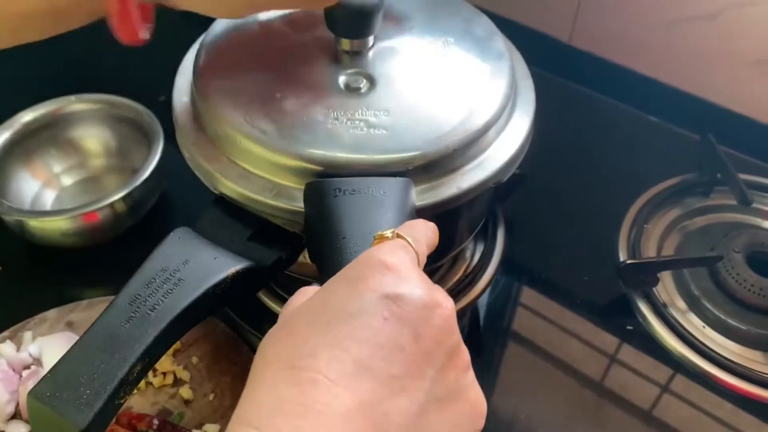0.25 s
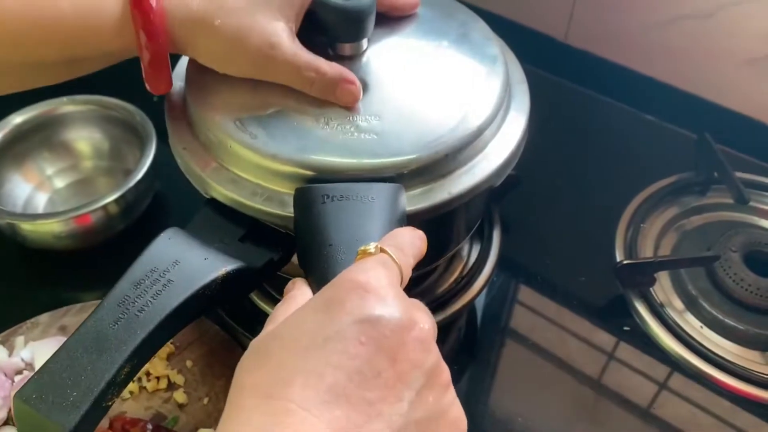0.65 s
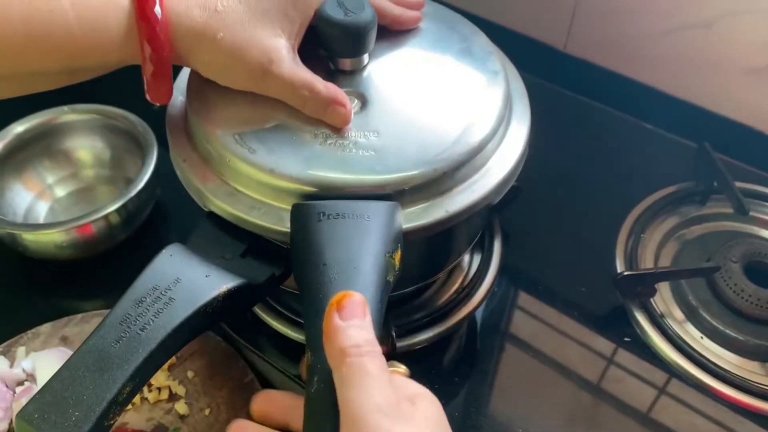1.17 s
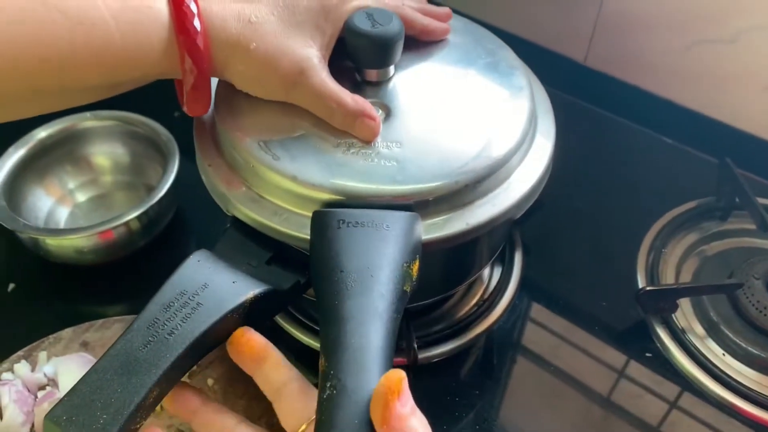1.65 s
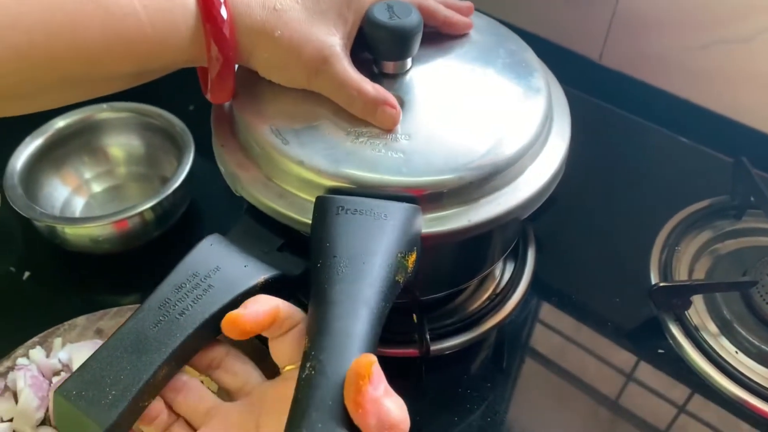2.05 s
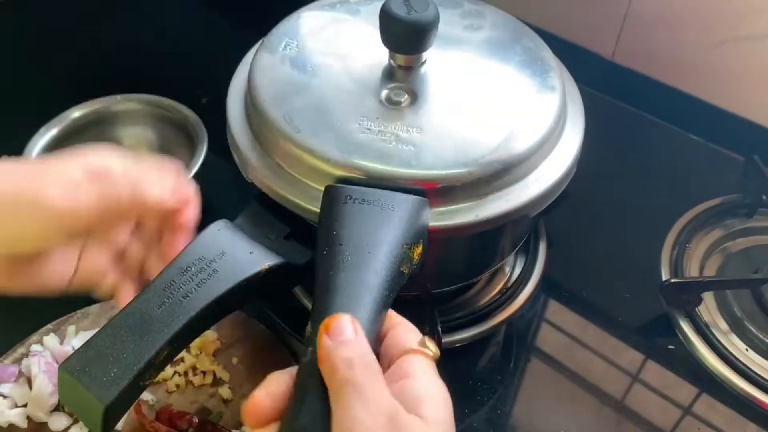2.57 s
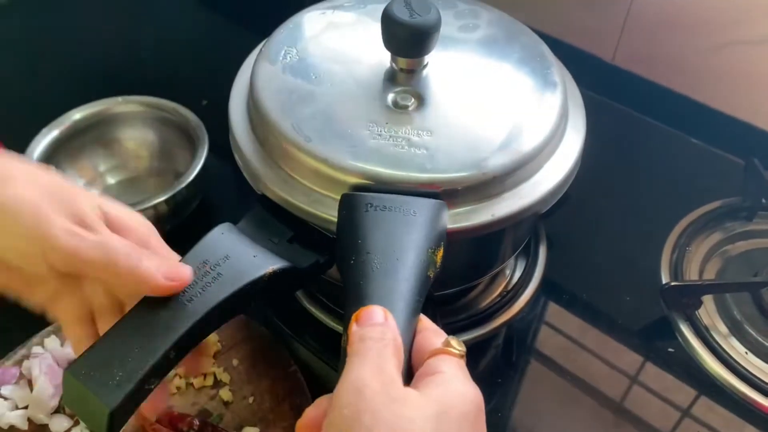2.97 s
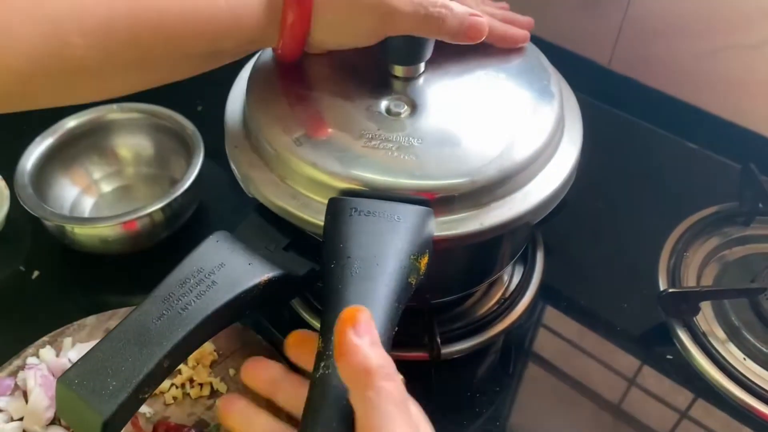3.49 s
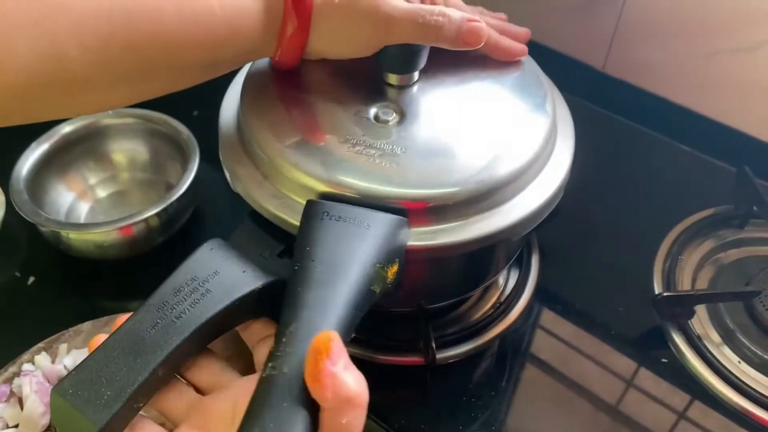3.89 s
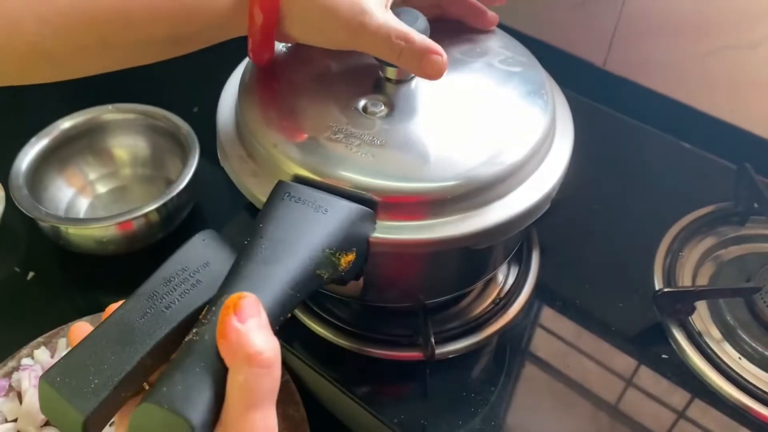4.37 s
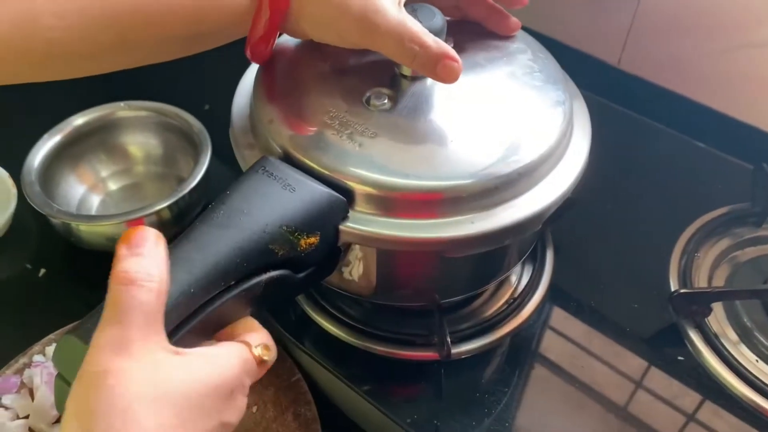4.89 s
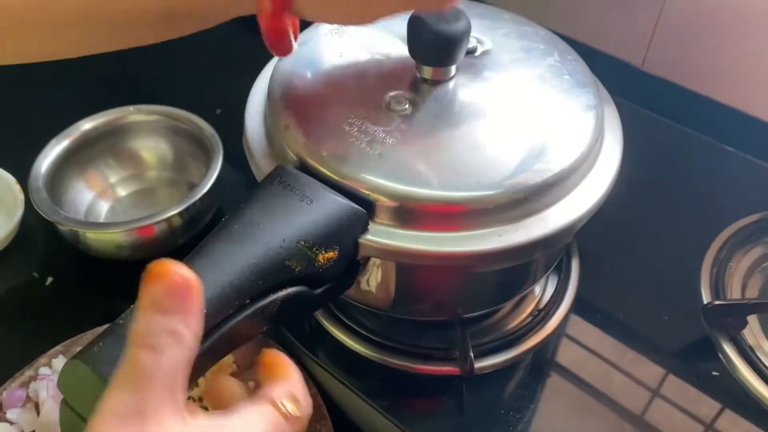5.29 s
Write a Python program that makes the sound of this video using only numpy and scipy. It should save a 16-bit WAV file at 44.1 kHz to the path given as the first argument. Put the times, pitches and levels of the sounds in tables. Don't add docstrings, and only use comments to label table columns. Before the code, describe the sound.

Close kitchen handling of a metal cooker: soft hollow thumps, small ticks, rubber drags and two ringing clacks over faint steady hiss.

```python
import sys
import numpy as np
from scipy import signal
from scipy.fft import rfft, irfft
from scipy.io import wavfile
from scipy.ndimage import uniform_filter1d

SR = 44100
rng = np.random.default_rng(int(sys.argv[2]) if len(sys.argv) > 2 else 0)


def materialize(psi):
    bounded = np.clip(np.atleast_2d(psi).T, -1, 1)
    quanta = np.round(bounded * 32767).astype(np.int16)
    wavfile.write(sys.argv[1], SR, quanta)


def voltage_ratio(decibels):
    exponent = np.asarray(decibels, float) / 20
    return 10 ** exponent


N = 244710
RING = np.arange(16384) / SR


def evened(x):
    return x / np.sqrt(np.mean(x ** 2) + 1e-20)


def read(points, hz):
    table_hz, value = np.transpose(points)
    return np.interp(np.log(hz + 1), np.log(table_hz + 1), value)


def add(mix, start_s, sound):
    part = mix[max(round(start_s * SR), 0):][:len(sound)]
    part += sound[:len(part)]


def coloured(noise, points):
    hz = np.fft.rfftfreq(len(noise), 1 / SR)
    return evened(irfft(rfft(noise) * voltage_ratio(read(points, hz)), len(noise)))


def smoothed(noise, span):
    return evened(uniform_filter1d(uniform_filter1d(noise, span), span))


def wobble(noise, span_s):
    return smoothed(noise, max(round(span_s * SR), 1))


def ringing(hz, t60):
    return voltage_ratio(-60 * RING / np.abs(t60)[:, None]) * np.sin(2 * np.pi * hz[:, None] * RING)


def burst(rise_s, fall_s):
    return (1 - np.exp(-RING / rise_s)) * np.exp(-RING / fall_s)


# freq_hz, likeness_0_to_1, hiss_left_lead_rad, pot_left_lead_rad
PORT_LIKENESS = [(0, .98, 0, 0), (120, .99, 0, 0), (280, .88, 0, -.1), (600, .35, -.3, -.3),
                 (1100, .25, -2.4, 1.6), (1800, .4, -3.1, .9), (2800, .25, -4.7, 1.4), (3700, .4, -6.3, 1),
                 (4600, .3, -6.3, .5), (5600, .25, -8.9, 0), (6200, .55, -12.5, -.1),
                 (6600, .75, -12.6, -.2), (7200, .5, -13.8, -1.2), (7750, .8, -15.4, -2.4),
                 (9100, .72, -16, -2.8), (9750, .75, -17.2, -4.6), (10500, .82, -18.7, -6.2),
                 (13000, .99, -18.85, -9.9)]


def pair(first, second, column):
    hz = np.fft.rfftfreq(N, 1 / SR)
    ports = np.transpose(PORT_LIKENESS)
    same = np.clip(np.interp(hz, ports[0], ports[1]), 0, 1)
    lead_rad = np.interp(hz, ports[0], ports[column])
    blend = same * rfft(first) + np.sqrt(1 - same ** 2) * rfft(second)
    return np.array([first, irfft(blend * np.exp(-1j * lead_rad), N)])


# freq_hz, level_db_per_hz
HISS_COLOUR = [(25, -7), (60, -3), (150, 5.5), (300, -1.5), (600, -6.5), (1200, -2.5), (2500, -4.5),
               (3000, -4.5), (4000, -6), (5800, -4.5), (7500, -3.5), (8400, -1), (10500, -1.5), (11600, -6)]
# freq_hz, left_minus_right_db
HISS_LEAN = [
    (3000, 0),
    (4400, -2.5),
    (5300, -6.5),
    (5900, -6.5),
    (6300, -0.5),
    (7600, -2),
    (8200, 0.5),
]
HISS_DB = -41.5


def hiss():
    lean_db = read(HISS_LEAN, np.fft.rfftfreq(N, 1 / SR))
    lean = voltage_ratio(np.array([[.5], [-.5]]) * lean_db)
    first, second, slow = rng.standard_normal((3, N))
    swell = voltage_ratio(0.7 * smoothed(slow, 9000))
    stereo = pair(coloured(first, HISS_COLOUR), coloured(second, HISS_COLOUR), column=2)
    return voltage_ratio(HISS_DB) * swell * irfft(rfft(stereo) * lean, N)


# start_s, grip_effort_db
GRIP = [(0.0, 10), (0.15, -7.5), (0.26, 6.5), (0.66, -0.5), (1.05, -7), (1.28, -23), (1.5, 1.5), (1.84, -6),
        (2.1, 1.5), (2.35, -4), (2.62, 2), (2.89, -9.5), (3.34, 4.5), (3.55, -10), (3.95, 9), (4.27, -21),
        (4.5, -3.5), (4.98, -26)]
# start_s, length_s, level_db
GASKET_SLIDES = [(0.04, 0.061, -57), (0.224, 0.22, -51), (0.78, 0.031, -46), (1.488, 0.038, -45),
                 (2.598, 0.14, -53.5), (3.357, 0.19, -52), (3.966, 0.14, -48.5), (4.12, 0.12, -47.5),
                 (4.407, 0.24, -52.5), (4.93, 0.16, -54), (5.12, 0.049, -61), (5.175, 0.079, -47.5)]
# pitch_hz, level_db, t60_s
POT_MODES = [
    (284, 1.5, 0.049),
    (352, -1.5, 0.038),
    (422.8, -2.5, 0.11),
    (510, -34, 0.027),
    (647, -6, 0.051),
    (663, -5.5, 0.028),
    (751, -5, 0.037),
    (770, -18.5, 0.052),
    (884, -8, 0.023),
]
LID_HZ = [930, 1075, 1150, 1223, 1296, 1387, 1452, 1653, 2140, 2290, 2713, 2907, 3176, 3295, 4011, 4490,
          4791, 5582, 5841, 6471, 6767, 7420, 8420, 9540, 10080, 10700, 11150]
# struck_at_valve_db, struck_at_rim_db, t60_s
LID_MODES = [(-20, -3, 0.063), (-6, -12.5, 0.11), (-23, -9, 0.07), (-15, -14, 0.3), (-6.5, -17, 0.1),
             (-15, -23, 0.03), (-15.5, 3.5, 0.11), (-9.5, -16, 0.18), (-10.5, -9, 0.07), (-11.5, -14, 0.12),
             (-29, -16, 0.051), (-37, -31, 0.069), (-9.5, -26, 0.13), (-18.5, -17, 0.16),
             (-10.5, -38, 0.17), (-44, -20, 0.06), (-12, -18, 0.085), (-12, -11, 0.11), (-3, -32, 0.04),
             (-10, -31, 0.09), (-21, -53, 0.16), (-5, -2.5, 0.076), (-27.5, -13.5, 0.046),
             (1.5, -17, 0.031), (-33, -21, 0.1), (-20.5, -3, 0.067), (-7, -19, 0.081)]
# freq_hz, level_db
SLAP_COLOUR = [
    (60, -6),
    (150, 13),
    (350, -5),
    (1000, 8),
    (3000, 4),
    (4000, -4),
    (7000, -8.5),
    (8500, -16.5),
    (11000, -8),
    (13000, -52),
]
RUMBLE_DB, SCRAPE_DB, SCRAPE_PER_GRIP = -50, -59, 0.74
SLIDE_RISE_S, SLIDE_FALL_S = 0.013, 0.047


def hands():
    t = np.arange(N) / SR
    rumble_noise, lump_noise, slip_noise = rng.standard_normal((3, N))
    grip_db = np.interp(t, *np.transpose(GRIP))
    lumps = voltage_ratio(3.5 * smoothed(lump_noise, 900))
    rumble_colour = [(30, 3.5), (70, 0.5), (110, -2.5), (160, 4.0), (250, -12.5), (400, -22.0)]
    rumble = evened(coloured(rumble_noise, rumble_colour) * lumps)
    slips = slip_noise * (rng.random(N) < 400 / SR)
    low_lid = [(pitch, row[0], row[2]) for pitch, row in zip(LID_HZ[:8], LID_MODES)]
    hz, db, t60 = np.transpose(POT_MODES + low_lid)
    scrape = evened(signal.oaconvolve(slips, voltage_ratio(db) @ ringing(hz, 0.46 * t60))[:N])
    scrape += voltage_ratio(-3.5) * coloured(rng.standard_normal(N), SLAP_COLOUR) * lumps
    sliding = voltage_ratio(SCRAPE_DB + SCRAPE_PER_GRIP * grip_db)
    for start_s, length_s, slide_db in GASKET_SLIDES:
        rise = np.clip((t - start_s) / SLIDE_RISE_S, 0, 1)
        release = np.exp(-np.maximum(t - start_s - length_s, 0) / SLIDE_FALL_S)
        sliding = sliding + voltage_ratio(slide_db) * rise * release
    return voltage_ratio(RUMBLE_DB + grip_db) * rumble + sliding * scrape


def scuffed(sound, length_s):
    touches = np.zeros(round(2 * length_s * SR))
    touches[rng.integers(0, len(touches), size=5)] = 0.44 * rng.standard_normal(size=5)
    touches[len(touches) // 4] = 1
    return signal.oaconvolve(sound, touches) / np.linalg.norm(touches)


# start_s, level_db, hardness_db
FINGER_TAPS = [(0.046, -26.5, -3), (0.064, -30, -5), (0.091, -32, -10), (0.245, -24, -2.5),
               (0.255, -31.5, -12), (0.405, -28, 1.5), (0.442, -32.5, 1), (0.599, -27.5, 0.5),
               (0.73, -16.5, 4.5), (0.746, -34, -13), (0.789, -36, 3), (1.062, -30.5, -3.5),
               (1.104, -21, 3.5), (1.138, -31, -4), (1.492, -29.5, 7), (1.505, -42, 3), (1.543, -31, -2),
               (1.677, -27, 2), (1.734, -31.5, -12), (1.78, -37, -12), (1.962, -38, 12), (2.031, -34, 2),
               (2.251, -24, -2.5), (2.291, -37, 10.5), (2.573, -25, -2), (2.582, -26.5, 3.5),
               (2.631, -48, -6), (2.677, -34, -20), (2.723, -29, -22), (2.764, -47, -6)]
# start_s, level_db, hardness_db
LID_JOLTS = [(3.077, -32, 1), (3.223, -25.5, -11), (3.27, -43, 5), (3.335, -21, 1.5), (3.364, -31, -1),
             (3.839, -24.5, 0.5), (3.853, -23.5, -7), (3.978, -23, -2), (3.992, -25, -1), (4.094, -24, 10),
             (4.149, -23.5, 4.5), (4.169, -31, 1), (4.492, -25, -17), (4.565, -30, 4), (4.959, -28.5, 2),
             (5.026, -30, 7.5), (5.047, -34.5, -8), (5.151, -41, -10), (5.198, -25.5, 2), (5.208, -30, -2),
             (5.29, -49, 0)]
LID_DB, LID_PER_HARDNESS, SLAP_DB = -9, 0.31, -7
POT_SPREAD = 0.045


def knocks():
    out = np.zeros(N)
    pot_hz, pot_db, pot_t60 = np.transpose(POT_MODES)
    valve_db, rim_db, lid_t60 = np.transpose(LID_MODES)
    lid_hz = np.array(LID_HZ)
    press = np.sin(np.pi / 2 * np.clip(RING / 0.0016, 0, 1)) ** 2
    pot = ringing(pot_hz, 1.39 * pot_t60) * press
    lid = ringing(lid_hz, 0.14 * lid_t60) * (1 - np.exp(-RING / 0.00035))
    soft_db = np.minimum(valve_db, rim_db) - 6.2 * np.log2(lid_hz / 1000)
    slap_envelope = burst(0.0027, 0.0054) + 0.17 * burst(0.0048, 0.024)
    for start_s, level_db, hard_db in FINGER_TAPS + LID_JOLTS:
        place, sign = rng.standard_normal((2, 40))
        skin = rng.standard_normal(len(RING))
        pot_weights = voltage_ratio(pot_db + 0.97 * place[:len(pot_db)]) * np.sign(sign[:len(pot_db)])
        body = np.interp(RING * (1 + POT_SPREAD * place[10]), RING, pot_weights @ pot)
        lid_weights = voltage_ratio(soft_db + 1.8 * place[-len(lid_hz):]) * np.sign(sign[-len(lid_hz):])
        metal = lid_weights @ lid
        sound = voltage_ratio(-3.5) * body / abs(body).max()
        sound += voltage_ratio(LID_DB + LID_PER_HARDNESS * hard_db) * metal / abs(metal).max()
        sound += voltage_ratio(SLAP_DB + hard_db) * coloured(skin, SLAP_COLOUR) * slap_envelope
        add(out, start_s - .003, scuffed(voltage_ratio(level_db) * sound, .006))
    return out


# start_s, peak_db, swing_hz
POT_ROCKS = [(0.048, -32.5, 285), (0.092, -34.5, 216), (0.255, -38, 109.5), (1.5, -38, 110),
             (0.275, -39, 108), (0.407, -38.5, 166), (0.44, -39.5, 99), (0.491, -44.5, 108),
             (0.6, -41, 290), (0.745, -32, 160), (1.109, -38, 165), (2.728, -40.5, 103),
             (1.498, -29.5, 268), (1.521, -32.5, 300), (1.677, -44, 167), (1.736, -38, 157),
             (1.961, -40, 300), (2.587, -31, 122), (2.623, -37.5, 111), (2.973, -39, 166),
             (3.077, -42, 161), (3.225, -42, 160), (3.333, -25.5, 165), (3.348, -38, 187),
             (3.363, -33, 168), (3.573, -42.5, 127), (3.837, -39, 177), (3.851, -32.5, 152),
             (3.977, -44, 214), (5.027, -31.5, 286), (5.154, -40, 164), (5.199, -32, 226),
             (1.109, -31, 260), (3.851, -30, 200), (1.15, -39, 196)]


def rocks():
    out = np.zeros(N)
    for start_s, peak_db, hz in POT_ROCKS:
        add(out, start_s, voltage_ratio(peak_db + 9.0) * np.sin(2 * np.pi * hz * RING) * burst(0.001, 1.21 / hz))
    return out


# start_s, peak_db,
# pitch_hz, length_cycles
TICKS_AND_TONES = [(0.243, -35, 2140, 6), (0.245, -32, 2570, 6), (0.257, -38, 2180, 8), (0.274, -30, 1070, 6.2),
                   (0.312, -41, 2100, 8), (0.335, -30, 2256, 18), (0.406, -34, 2200, 8), (0.429, -38, 2440, 10),
                   (0.73, -24, 3170, 10), (0.736, -20, 3050, 5.6), (1.103, -32, 2850, 12),
                   (1.489, -28, 2470, 9.4), (1.494, -33, 3320, 7.9), (1.498, -31.5, 1118, 19),
                   (1.511, -30, 1155, 13), (3.039, -48, 630, 20), (3.073, -40, 836, 3.3),
                   (3.145, -37, 1320, 8.4), (3.16, -35, 1470, 5.6), (3.159, -37, 1050, 13),
                   (3.171, -36, 1190, 7.7), (3.184, -42, 1190, 6), (3.222, -45, 800, 4.2),
                   (3.296, -37, 820, 8.1), (3.975, -31, 2120, 11), (3.98, -32, 2680, 17),
                   (3.988, -30.5, 1288, 55), (4.085, -22, 2160, 8.3), (4.094, -17.5, 2180, 8.7),
                   (4.099, -18.5, 1266, 12), (4.141, -27, 2250, 12), (0.73, -31, 4800, 6),
                   (0.733, -23, 2240, 9.1), (1.106, -31, 3700, 6), (1.108, -32, 308, 4.9),
                   (2.251, -31.5, 290, 3.6), (2.25, -33, 910, 3.2), (3.332, -23, 2200, 34),
                   (3.333, -38, 4011, 52), (3.333, -24, 4790, 40), (3.332, -10.5, 6790, 23),
                   (3.351, -32, 4080, 50), (4.08, -17.5, 4620, 21), (4.082, -18, 9900, 33),
                   (4.962, -43, 2600, 8), (5.026, -34, 2820, 11), (5.195, -37, 2650, 22),
                   (5.198, -37, 3700, 22), (5.2, -35, 1940, 13)]
# start_s, peak_db, pitch_hz, length_cycles
MORE_TICKS_AND_TONES = [(0.271, -29, 10300, 20), (0.282, -34, 11000, 20), (0.334, -36, 10700, 20),
                        (0.73, -26, 6900, 10), (0.731, -30, 5600, 10), (0.731, -26, 780, 3.3),
                        (0.738, -28, 1500, 2.4), (0.744, -29, 435, 3.4), (1.104, -37, 870, 3),
                        (1.107, -26.5, 2060, 5.5), (1.49, -30.5, 760, 2.5), (1.975, -32, 3200, 16),
                        (1.976, -34, 3950, 16), (1.988, -36, 3170, 25), (2.054, -38, 1510, 6),
                        (2.249, -32, 1210, 3.3), (2.287, -30, 1700, 3.6), (2.577, -36, 690, 2.6),
                        (2.584, -27.5, 690, 4.4), (2.595, -31, 1104, 12), (2.622, -46.5, 1654, 20),
                        (2.582, -35, 4260, 25), (2.584, -33, 7480, 40), (3.316, -24, 6700, 14),
                        (3.333, -24, 7450, 50), (3.345, -32, 3176, 90), (3.35, -25, 1290, 14), (0.334, -27, 1310, 2),
                        (5.03, -38, 3470, 12), (5.21, -42, 2750, 65), (4.081, -26, 5600, 10), (4.08, -26, 7450, 30),
                        (4.15, -38, 2780, 20), (3.334, -24, 8900, 20), (0.6, -33, 291, 5.8), (5.2, -38, 600, 5),
                        (3.84, -34, 2500, 8), (3.839, -37, 3280, 14), (3.848, -31, 1280, 7.7),
                        (3.857, -24, 424, 2.7), (3.976, -31, 1500, 2), (4.081, -16, 1120, 1.5),
                        (4.086, -27, 5610, 25), (4.09, -30, 3300, 34), (4.094, -39, 6450, 50),
                        (4.141, -31, 3200, 15), (4.146, -41, 4350, 30), (4.128, -41, 5610, 51),
                        (4.155, -42, 3920, 25), (5.197, -25.5, 846, 5.2), (5.199, -26.5, 422, 6.6),
                        (5.199, -29.5, 1110, 7)]


def ticks():
    out = np.zeros(N)
    for start_s, peak_db, hz, cycles in TICKS_AND_TONES + MORE_TICKS_AND_TONES:
        add(out, start_s, voltage_ratio(peak_db) * np.sin(2 * np.pi * hz * RING) * burst(0.00073, cycles / hz))
    return out


# start_s, contact_peak_db, contact_hz, ring_db, tick_db
VALVE_HITS = [(0.314, -24, 780, -39, -33), (0.333, -15, 1220, -31, -26.5), (0.431, -31, 760, -37, -52),
              (1.976, -18.5, 1450, -39, -34), (2.019, -20, 1470, -36, -55), (2.039, -26, 1440, -44, -60),
              (2.064, -28, 1470, -49, -56), (2.582, -47, 1040, -38, -29), (3.158, -37, 1210, -36.5, -55),
              (3.317, -2, 1470, -25.5, -17), (3.331, -22, 1676, -22, -10.5), (3.337, -6, 1204, -24.5, -24),
              (3.351, -6, 1280, -25.5, -42), (3.362, -7, 1270, -26.5, -24.5), (3.374, -26, 1270, -42, -47)]
# start_s, contact_peak_db, contact_hz, ring_db, tick_db
RIM_BRUSHES = [
    (4.071, -26, 1010, -27, -29),
    (4.079, -6, 1360, -26.5, -10.5),
    (4.080, -9, 660, -49, -51),
    (4.086, -12.5, 894, -26, -45),
    (4.089, -35, 614, -40, -43),
]
# start_s, contact_peak_db, contact_hz, ring_db, tick_db
LUG_HITS = [
    (3.832, -30, 750, -53, -25.5),
    (3.843, -44, 800, -37.5, -26),
    (3.983, -31, 1310, -36, -51),
    (4.084, -5, 1650, -27, -16.5),
    (4.093, -7, 1660, -37, -39),
    (4.138, -36, 1640, -34, -34),
    (4.562, -22, 1153, -41, -52),
    (4.964, -20, 1000, -42, -62),
    (5.023, -25, 990, -41.5, -59),
]
# freq_hz, level_db
TICK_COLOUR = [
    (300, 0.5),
    (2000, -1),
    (4500, -4),
    (6000, -6.5),
    (7200, -2),
    (8500, 3),
    (10300, 5.5),
    (11800, -1.5),
    (13000, -44),
]
# from_s, to_s
PALM_OFF = (3.3, 4.12)
VALVE_PLACE, BRUSH_PLACE, RIM_PLACE = 0.037, 0.63, 0.75
ROUGH_S, RING_ROUGH = 0.0042, 0.75


def clinks():
    out = np.zeros(N)
    hz = np.array(LID_HZ)
    valve_db, rim_db, t60 = np.transpose(LID_MODES)
    free, held = ringing(hz, t60), ringing(hz, .4 * t60)
    tick_envelope = burst(0.0022, 0.0048) + 0.11 * burst(0.0055, 0.018)
    for hits, place in [(VALVE_HITS, VALVE_PLACE), (RIM_BRUSHES, BRUSH_PLACE), (LUG_HITS, RIM_PLACE)]:
        for start_s, peak_db, contact_hz, ring_db, tick_db in hits:
            chance, sign = rng.standard_normal((2, len(hz)))
            grit = rng.standard_normal(len(RING))
            weights = voltage_ratio(valve_db + place * (rim_db - valve_db) + 1.5 * chance) * np.sign(sign)
            clack = np.sin(2 * np.pi * contact_hz * RING) * burst(0.0011, 4.04 / contact_hz)
            lid = free if PALM_OFF[0] < start_s < PALM_OFF[1] else held
            ring = weights @ lid * (1 - np.exp(-RING / 0.0011))
            ring *= 1 + RING_ROUGH * wobble(grit, ROUGH_S)
            tick = coloured(grit, TICK_COLOUR) * tick_envelope
            sound = voltage_ratio(peak_db - 2.5) * clack + voltage_ratio(ring_db - 0.5) * ring + voltage_ratio(tick_db + 0.5) * tick
            add(out, start_s, sound)
    return out


# start_s, level_db, pitch_hz, t60_s
LID_SINGS = [
    (3.34, -33, 1228, .7),
    (3.4, -42, 1190, .7),
    (3.36, -38, 1653, .2),
    (3.36, -41, 1800, .15),
    (3.995, -41, 1654, .8),
    (3.345, -34, 1298, .8),
    (3.335, -31, 2141, .12),
    (4.084, -34, 1654, .55),
    (2.8, -34, 2170, .12),
]
WAVER_S, WAVER_HZ, SING_ROUGH = 0.042, 3.7, 0.19


def singing():
    out = np.zeros(N)
    for start_s, level_db, hz, t60 in LID_SINGS:
        drift, swell = rng.standard_normal((2, len(RING)))
        turns = np.cumsum(hz + WAVER_HZ * wobble(drift, WAVER_S)) / SR
        tone = voltage_ratio(level_db - 60 * RING / abs(t60)) * np.sin(2 * np.pi * turns)
        tone = tone * (1 + SING_ROUGH * wobble(swell, WAVER_S))
        add(out, start_s, tone * (1 - np.exp(-RING / 0.0053)))
    return out


# freq_hz, t60_s
KITCHEN_DECAY = [
    (100, .13),
    (250, .2),
    (500, .26),
    (1500, .22),
    (5000, .2),
    (12000, .13),
]


def kitchen(x):
    taps = np.zeros((2, SR // 2))
    jitter = rng.integers(0, 20, (2, (SR // 2 - 101) // 20))
    at = np.arange(100, SR // 2 - 20, 20) + jitter
    np.put_along_axis(taps, at, rng.choice([-1., 1.], at.shape), 1)
    hz, t, z = signal.stft(taps, SR, nperseg=256)
    decay = voltage_ratio(-60 * t / read(KITCHEN_DECAY, hz)[:, None])
    tail = signal.istft(z * decay, SR, nperseg=256)[1]
    return signal.fftconvolve(x[None], tail / np.linalg.norm(tail[0]), axes=1)[:, :N]


def scene():
    dull = knocks() + rocks() + hands()
    bright = clinks() + singing() + ticks()
    dull = signal.sosfilt(signal.butter(2, 58, "high", fs=SR, output="sos"), dull)
    wet = kitchen(voltage_ratio(-5.5) * dull + voltage_ratio(-12.0) * bright)
    direct = dull + bright
    close = pair(direct + wet[0], 0.47 * direct + 1.53 * wet[1], column=3)
    return close * voltage_ratio(np.array([[.3], [-.3]])) + hiss()


def thinned(x, margin_db, lowest_hz):
    window = np.sqrt(signal.windows.hann(2048, sym=False))
    hz, t, z = signal.stft([x[0] + x[1], x[0] - x[1]], SR, window, 2048, 1024)
    power = abs(z[:, :1024]) ** 2
    bands = np.repeat(power.reshape(2, 128, 8, -1).mean(axis=2), 8, axis=1)
    around = np.exp(uniform_filter1d(np.log(bands.mean(axis=0) + 1e-20), size=48, axis=0))
    treble = power[:, 300:].sum(axis=(0, 1))
    calm = treble < 1.8 * np.roll(treble, 1)
    weak = bands < around * voltage_ratio(2 * margin_db)
    z[:, :1024] *= ~(weak & (hz[:1024, None] > lowest_hz) & calm)
    both, apart = signal.istft(z, SR, window, 2048, 1024)[1][:, :N]
    return np.array([both + apart, both - apart]) / 2


def low_pass(x):
    return signal.sosfilt(signal.butter(12, 12840, fs=SR, output="sos"), x)


def record(dry):
    lean = signal.sosfilt(signal.butter(2, 45, "high", fs=SR, output="sos"), dry)
    limited = signal.oaconvolve(lean, signal.firwin(255, 11850, fs=SR)[None], "same")
    mix = thinned(limited, margin_db=-2.4, lowest_hz=1000)
    return low_pass(mix)


dry = scene()
out = record(dry)
materialize(out)
```